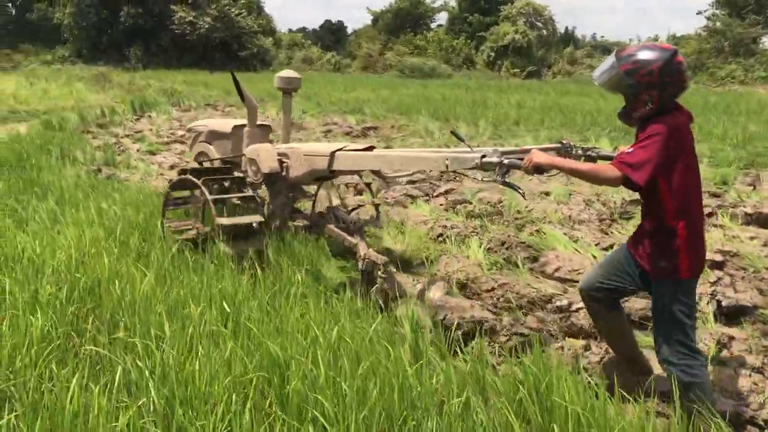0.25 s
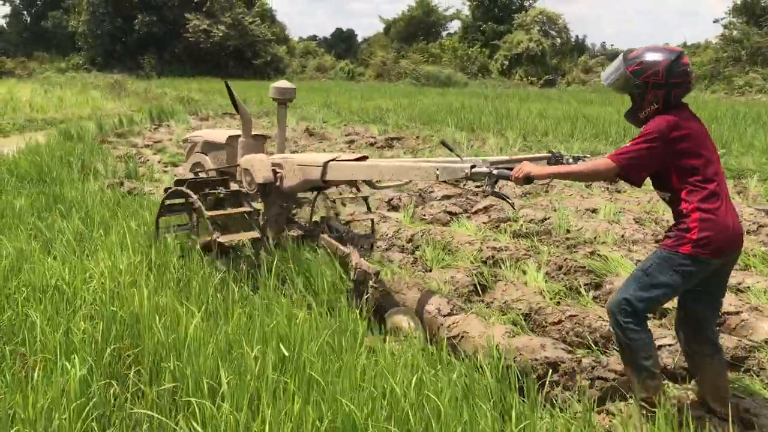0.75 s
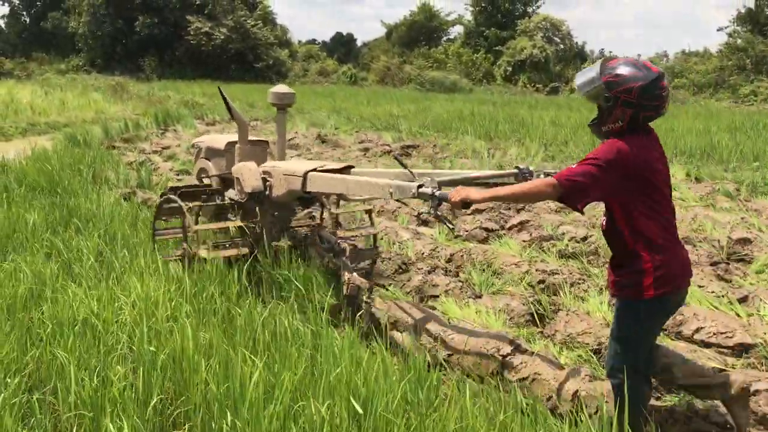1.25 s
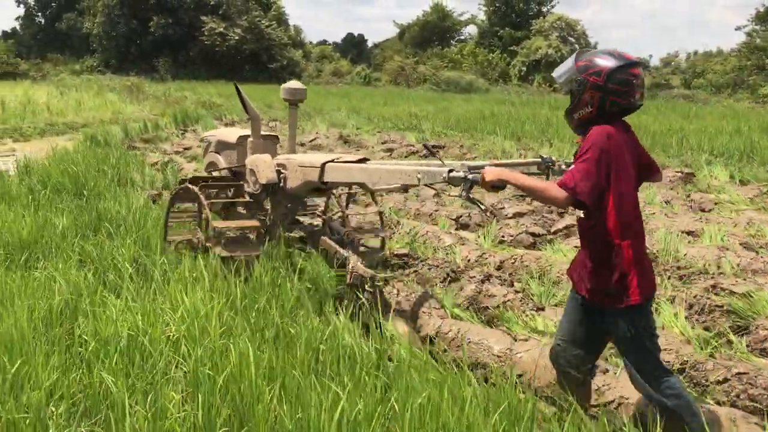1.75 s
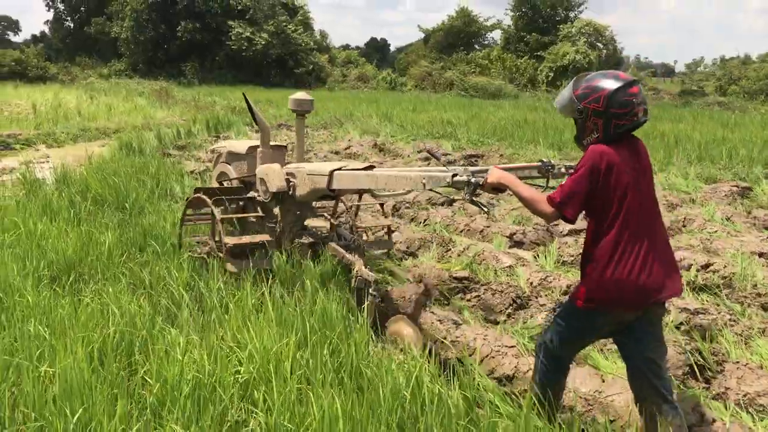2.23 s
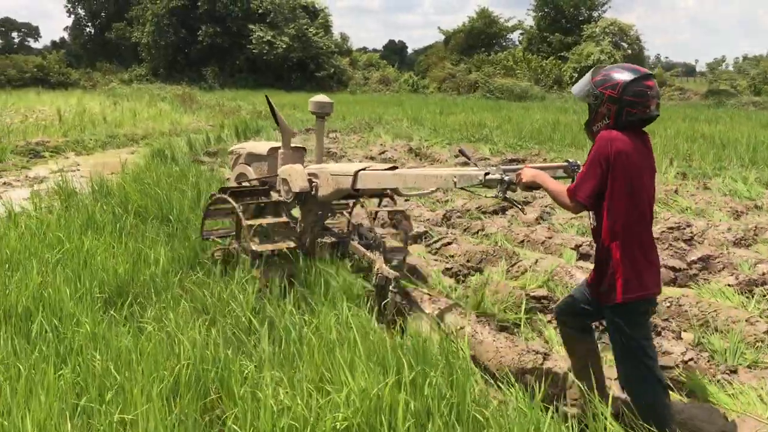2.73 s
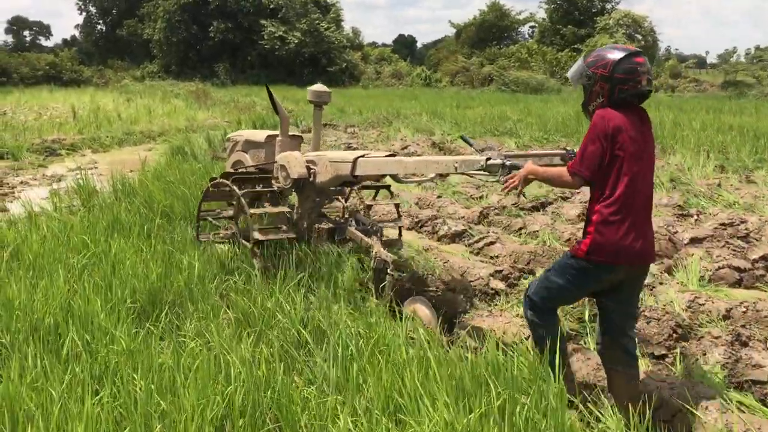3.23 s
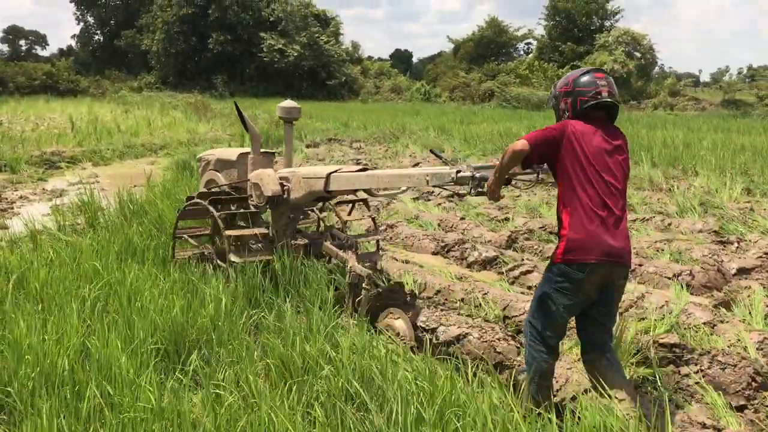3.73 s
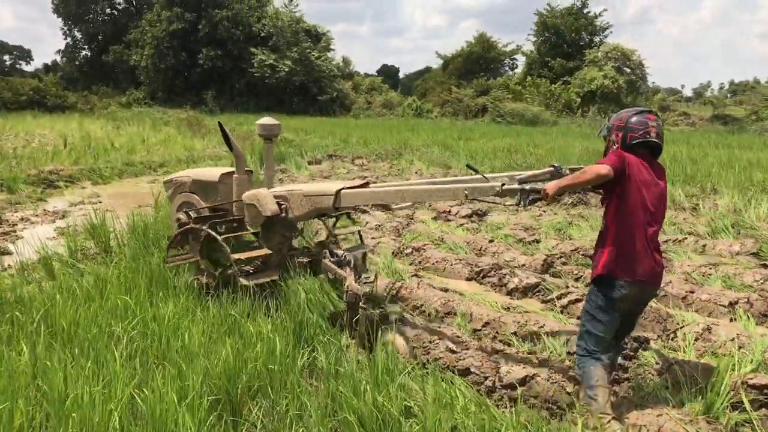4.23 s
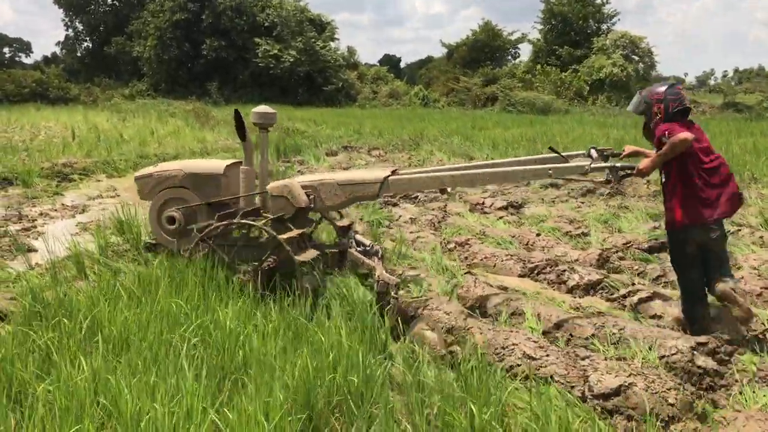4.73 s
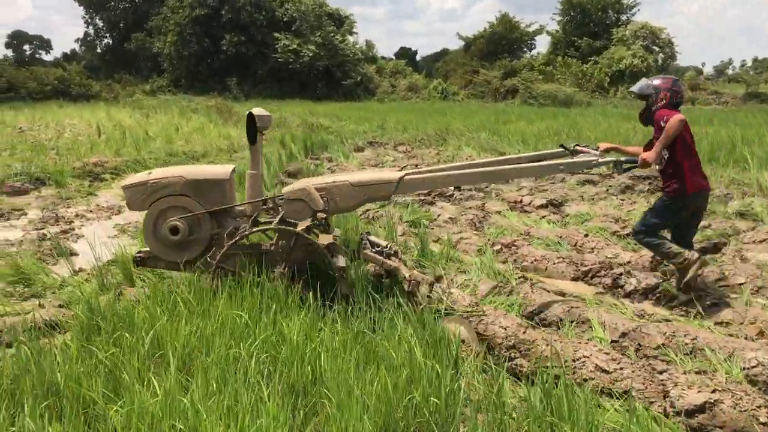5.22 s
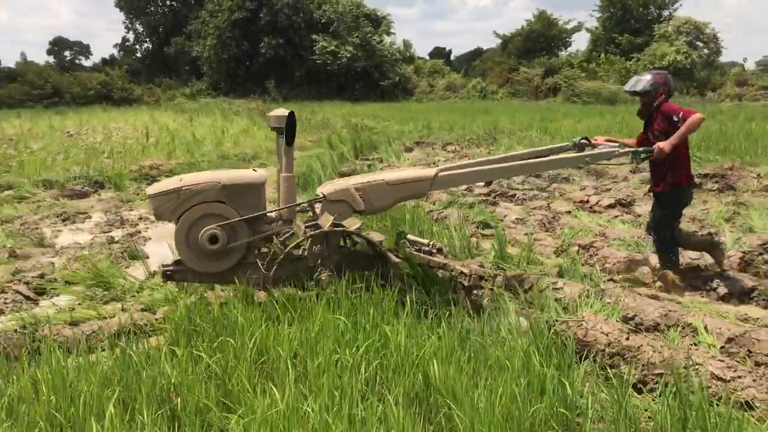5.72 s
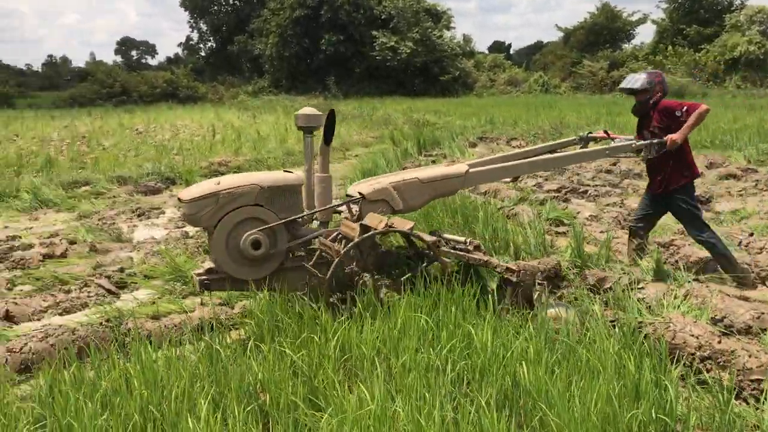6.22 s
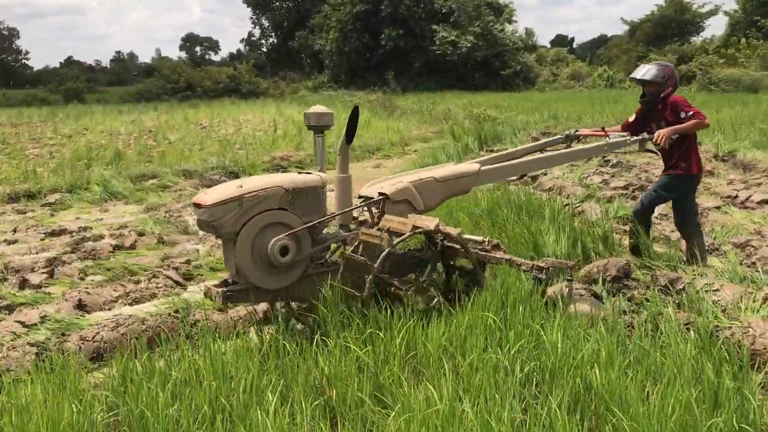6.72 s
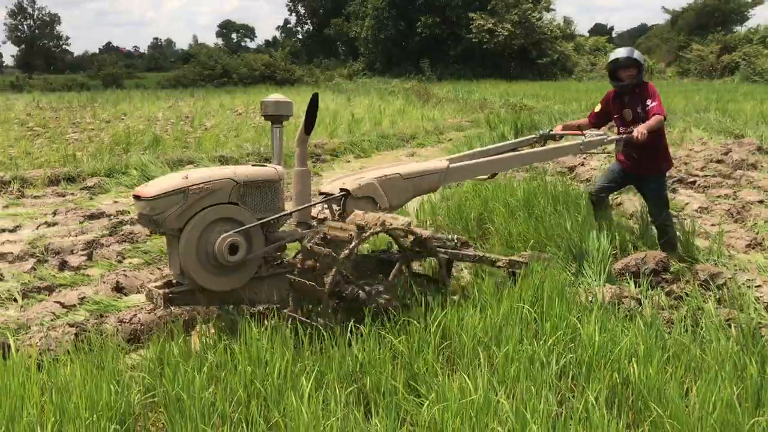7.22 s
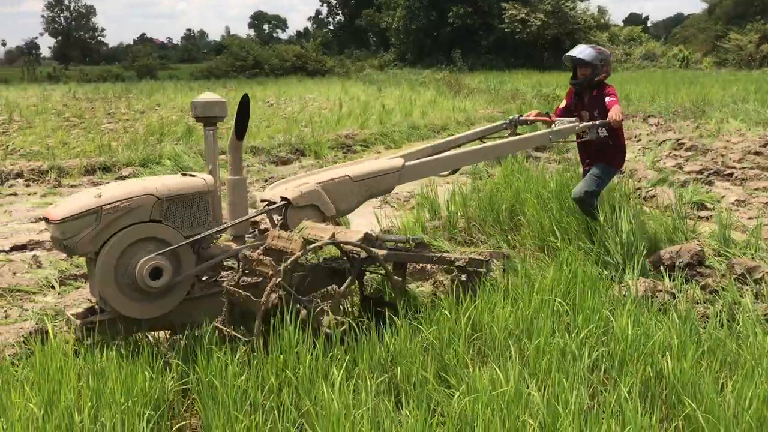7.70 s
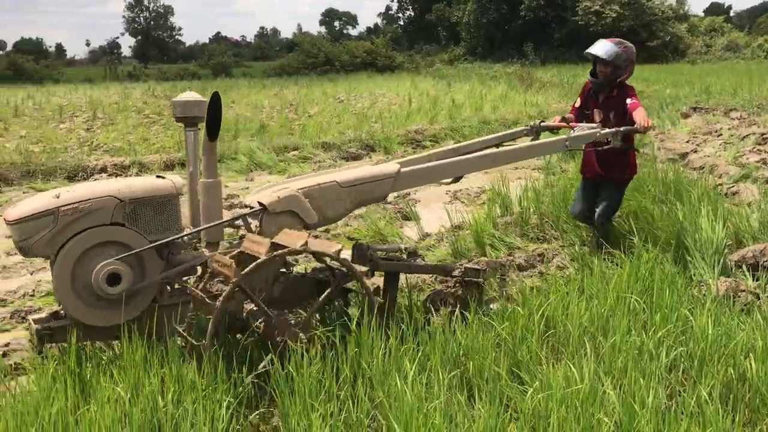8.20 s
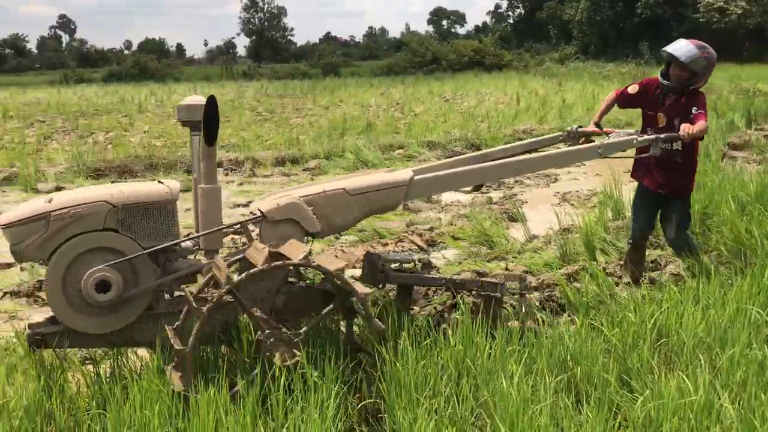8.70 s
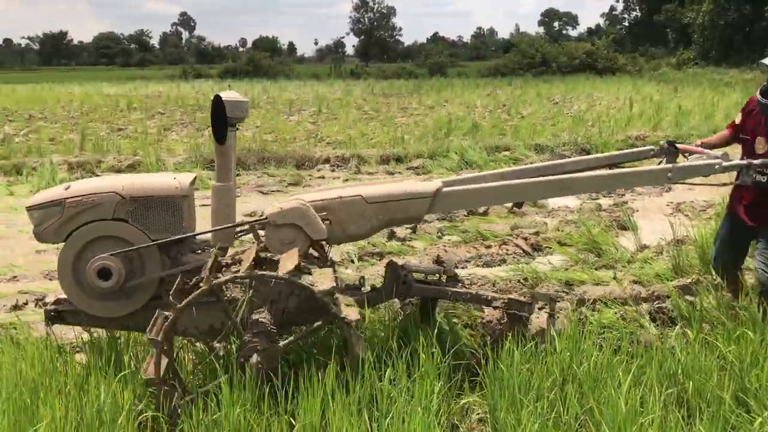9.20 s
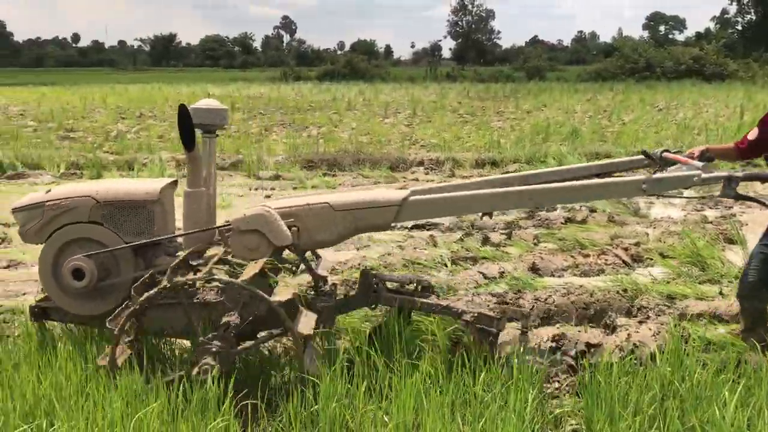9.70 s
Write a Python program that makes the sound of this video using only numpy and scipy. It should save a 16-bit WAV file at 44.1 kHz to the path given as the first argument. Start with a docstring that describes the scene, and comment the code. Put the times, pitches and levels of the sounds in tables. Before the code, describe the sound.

A single-cylinder diesel walking tractor pulls a plough through wet soil, already running at the start and still running at 10 seconds. It fires about seven times a second, slightly uneven: hard knock, faint valve tick, raspy mid-high bark with hiss and low thump, softer puff, then an airy gulp. Gears whirr quietly with loose ticking and thin rustle. At 1.0 s the linkage clanks; around 1.1-1.3 s beats falter, one nearly lost to weak spits. Firing softens near 2.6 and 3.8 s. At 3.95 s a longer metallic clatter comes with dull frame bumps, then a light clank at 5.0. From about 5 to 7 s strong and weak beats alternate; the view turns side-on, knock harder, hiss brighter. Small squeaks at 7.4 and 7.6 s, a strong clank at 8.8, a lesser one and brief stumble around 9.1. Dry, open-air, no echo.

```python
"""A wet open field is ploughed by a walking tractor, heard first from behind and then from the side.
Its one-cylinder four-stroke diesel fires about seven times a second: a knock of burning fuel, a tick of
the valve gear, a bark and low thump of the exhaust, a weaker puff, then a gulp of air.
These are shaped noise bursts and ringing tones. Filtered noise makes the gears, rustle and intake breath;
now and then the plough linkage clanks, the frame bumps or something squeaks."""
import sys
import numpy as np
from scipy import signal
from scipy.io import wavfile
from scipy.ndimage import uniform_filter1d

SR = 44100
rng = np.random.default_rng(int(sys.argv[2]) if len(sys.argv) > 2 else 0)


def wav_record(signal):
    """Record a signal, one row per channel, as 16-bit PCM in the file named by sys.argv[1]."""
    frames = np.transpose(np.atleast_2d(signal))
    bounded = np.clip(frames, -1, 1)
    # unit amplitude maps onto the largest positive 16-bit level
    quanta = np.round(bounded * 32767).astype(np.int16)
    wavfile.write(sys.argv[1], SR, quanta)


N = 438794  # samples in the scene, 9.95 s
T = np.arange(8192) / SR  # clock of one short sound (s)

# how the engine block colours a blow: pitch_hz, level_db
BLOCK_COLOUR = [(90, -25.5), (200, -5.5), (300, -8), (490, -13.5), (680, -2.5), (830, -6.5), (1000, -4),
                (1300, -3.5), (1620, -3), (2000, -4.5), (3000, -11.5), (3600, -19.5), (5000, -27.5),
                (16000, -31)]
# colour of bright, thin sounds (small ticks, stems and wet soil): pitch_hz, level_db
RUSTLE_COLOUR = [(1500, 3), (4500, -2.5), (7500, 1.5), (10000, 5), (16000, 2)]


def gain_of(db):
    """Turns decibels into amplitude."""
    return 10 ** (np.asarray(db) / 20)


def evened(x):
    """Scales a sound to an average strength (rms) of 1."""
    return x / np.sqrt(np.mean(x ** 2) + 1e-20)


def burst(x, db):
    """Gives a short sound the energy of 24 ms at the level db."""
    return gain_of(db) * x / np.sqrt(np.sum(x ** 2) / (.024 * SR) + 1e-20)


def add(mix, s, sound):
    """Mixes a sound in from time s, cutting off what falls outside the scene."""
    start = round(s * SR)
    part = mix[max(start, 0):][:max(len(sound) + min(start, 0), 0)]
    part += sound[max(-start, 0):][:len(part)]


def follow(points, s):
    """Reads a two-column table at time s, with straight lines between its points."""
    return np.interp(s, *np.transpose(points))


def read(points, size=2048):
    """Turns a colour table into a dB spectrum; below its first point it falls 12 dB an octave, by 40 at most."""
    hz, db = np.transpose(points)
    f = np.fft.rfftfreq(size, 1 / SR) + 10  # the 10 Hz keeps the logarithm finite
    fall = np.clip(12 * np.log2(f / hz[0]), -40, 0)
    return np.interp(np.log(f), np.log(hz), db) + fall


def colour(x, db):
    """Filters with the given spectrum without smearing sound ahead of an attack (minimum phase)."""
    log_gain = np.log(gain_of(np.r_[db, db[-2:0:-1]]))
    taps = np.fft.ifft(np.exp(np.conj(signal.hilbert(log_gain)))).real
    return signal.fftconvolve(x, taps)[:len(x)]


def resonate(x, hz, width):
    """Rings at one pitch; a narrower width in Hz rings longer."""
    r = np.exp(-np.pi * width / SR)
    return 2 * signal.lfilter([1 - r], [1, -r * np.exp(2j * np.pi * hz / SR)], x).real


def gust(rise, length, steep):
    """Turbulent air as noise that swells, holds for about length seconds and collapses."""
    swell = 1 - np.exp(-(T / rise) ** 2)
    return rng.standard_normal(len(T)) * swell / np.sqrt(1 + (T / length) ** steep)


def rattle(rise, t60, grain_db):
    """A blow breaks up into a shower of uneven impacts that falls 60 dB in t60 seconds."""
    grains = np.repeat(rng.standard_normal(len(T) // 32), 32)
    impacts = rng.standard_normal(len(T)) * gain_of(grain_db * grains)
    return impacts * (1 - np.exp(-T / rise)) * gain_of(-60 * T / t60)


def swing(hz, peak_s):
    """A resonance whose swing builds up for peak_s seconds and dies away."""
    return (T / peak_s) ** 2 * np.exp(2 - 2 * T / peak_s) * np.sin(2 * np.pi * hz * T)


def patches(depth_db, size=24):
    """Random peaks and dips across the spectrum: no two jets or blows have the same colour."""
    smooth = uniform_filter1d(rng.standard_normal(1025), size)
    return depth_db * evened(uniform_filter1d(smooth, size // 2))


def flutter(depth_db):
    """A jet tears into spurts about a millisecond long."""
    return gain_of(depth_db * evened(uniform_filter1d(rng.standard_normal(len(T)), size=48)))


def valve_times():
    """The exhaust valve opens once in every engine cycle, so its times follow the engine speed."""
    # speed sags as the plough bites and recovers under the governor: time_s, firings_per_s
    speed_points = [(0.0, 6.837), (1.21, 7.088), (1.4, 6.667), (1.8, 6.652), (1.93, 7.094), (2.76, 6.831),
                    (3.81, 7.22), (4.01, 6.951), (4.23, 7.427), (4.81, 7.008), (5.36, 7.082), (5.47, 6.84),
                    (5.69, 7.124), (6.13, 7.197), (6.58, 6.955), (6.69, 7.194), (7.27, 6.837),
                    (7.87, 7.031), (8.42, 6.909), (9.03, 7.109), (9.22, 6.674), (9.95, 7.2)]
    first_valve_s = .0900
    t = np.arange(N) / SR
    cycles = np.cumsum(follow(speed_points, t)) / SR
    cycles -= np.interp(first_valve_s, t, cycles)
    return np.interp(np.arange(np.ceil(cycles[-1] + .25)), cycles, t)


def firings():
    """The plough's load sets each firing's strength; chance scatters it.

    Rows: start_s, bark_db, hiss_db, thump_db, ring_hz, blast_s, knock_db.
    """
    # strength of the firings, following the load on the plough: time_s, change_db
    load_points = [(0, -0.5), (.24, .5), (.95, 0.9), (1.53, -1.4), (1.83, 1.5), (2.55, -3), (2.69, -0.7),
                   (3.56, 0.7), (3.83, -3), (4.39, -1.7), (4.53, -2.7), (4.67, 0.4), (6.93, -1.3),
                   (7.07, .5), (8.94, -0.1), (9.75, 0.8)]
    # firings that falter or catch up hard: time_s, bark_change_db, hiss_change_db, thump_change_db, knock_change_db
    misfires = [(1.095, -1.7, -7.5, -2.5, -2), (1.236, -14, -27, -5.5, 1), (6.221, -0.8, -3, -4, 0.5),
                (9.08, -3, -7, -4, 0.5), (9.227, 2, 0.5, 0, 5.5)]
    # pitch of the pipe's main ring before scatter: time_s, pitch_hz
    ring_points = [(0, 2293), (2.8, 2320), (3.5, 2400), (3.85, 2030), (4.12, 2000), (4.3, 2370),
                   (5.1, 2290), (6, 2390), (9.95, 2300)]
    # hardness of the knock before scatter, louder as the block turns side-on: time_s, level_db
    knock_points = [(0.0, -29), (0.52, -27.5), (0.67, -30), (1.83, -26.5), (1.98, -31.5), (3.13, -26.5),
                    (3.27, -30), (4.95, -27.3), (5.23, -29.7), (5.52, -25.1), (5.8, -28.5), (6.79, -23.5),
                    (7.79, -22.5), (7.94, -27.5), (8.37, -24.1), (9.95, -28.0)]
    # the governor hunts: strong and weak firings alternate for a while
    hunt_from_s, hunt_to_s, hunt_db = 4.6, 7.3, 0.72
    # at normal load; the hiss follows the load most steeply, the thump least (dB per dB)
    bark_db, hiss_db, thump_db = -15.5, -20.5, 1.3
    hiss_per_load, thump_per_load = 1.3, 0.29
    blast_s, blast_growth_per_db = 0.0072, 0.0249
    # scatter between firings: three in dB, then pitch and blast length as shares
    bark_scatter_db, hiss_scatter_db, knock_scatter_db = 0.6, 0.67, .5
    ring_scatter, blast_scatter = 0.059, 0.089

    s = valve_times()
    chance = rng.standard_normal((len(s), 5)).T
    hunting = (s > hunt_from_s) & (s < hunt_to_s)
    load = follow(load_points, s) + hunt_db * (-1) ** np.arange(len(s)) * hunting
    reach_s = np.diff(s).min() / 2  # a misfire changes only a firing this close to it
    bark, hiss, thud, slap = sum(np.outer(change, abs(s - at) < reach_s) for at, *change in misfires)
    return np.transpose([
        s,
        bark_db + load + bark + bark_scatter_db * chance[0],
        hiss_db + hiss_per_load * load + hiss + hiss_scatter_db * chance[1],
        thump_db + thump_per_load * load + thud,
        follow(ring_points, s) * (1 + ring_scatter * chance[2]),
        blast_s * np.exp(blast_growth_per_db * load + blast_scatter * chance[3]),
        follow(knock_points, s) + slap + knock_scatter_db * chance[4]])


def running_gear(clicks_per_s=70, spread_db=6.0):
    """Gears whirr as steady noise, loose parts tick in the block, and the wheels rustle in the field."""
    # gears, belt and flywheel: pitch_hz, level_db
    gear_colour = [(30, -19), (70, 0), (150, 7), (200, -2.5), (270, 1), (380, -2), (480, -15), (620, -1.5),
                   (860, -4.5), (1100, -0.5), (1600, -3.5), (2500, -10), (3500, -12.5), (5000, -22),
                   (9000, -35)]
    # relative loudness through the scene: time_s, gear_db, rustle_db
    bed_levels = [(0.0, -29, -46), (0.19, -32.5, -42.5), (2.19, -31.5, -45.5), (3.16, -33.5, -44),
                  (3.32, -34, -46), (6.15, -33.5, -50.5), (6.62, -30, -49), (6.93, -32.5, -45),
                  (8.59, -33, -48), (8.98, -28.5, -45), (9.42, -35.5, -47.5), (9.95, -34, -48.5)]
    s, gear_db, rustle_db = np.transpose(bed_levels)
    t = np.arange(N) / SR
    whirr = evened(colour(rng.standard_normal(N), read(gear_colour)))
    sizes = gain_of(spread_db * np.minimum(rng.exponential(1, N), 4)) * rng.choice([-1, 1], N)
    clicks = sizes * (rng.random(N) < clicks_per_s / SR)
    ticks = evened(colour(clicks, read(BLOCK_COLOUR)))
    rustle = evened(colour(rng.standard_normal(N), read(RUSTLE_COLOUR)))
    gears = (gain_of(-5) * whirr + gain_of(-28) * ticks) * gain_of(np.interp(t, s, gear_db))
    return gears + gain_of(2.5) * rustle * gain_of(np.interp(t, s, rustle_db))


def intake(beats):
    """The falling piston gulps air through the ringing stack, over a steady breath; the filter can hums after."""
    # air column of the intake stack: pitch_hz, width_hz, level_db
    stack_modes = [(610, 49, -13), (763, 8.3, 6), (957, 48, 2), (1100, 65, -1), (1157, 22, 3.5),
                   (1323, 24, 1), (1525, 43, 0), (1780, 41, -1), (2350, 320, -5), (3460, 220, -13)]
    gulp_lag_s, can_lag_s = .047, .0617  # after the exhaust valve opens
    can_hz, can_peak_s, can_db = 72, .036, -36.5
    flow = gain_of(-4.5) * rng.standard_normal(N)
    hum = np.zeros(N)
    for s, *_ in beats:
        gulp = gust(rise=0.015, length=0.022, steep=5.6)
        add(flow, s + gulp_lag_s, gain_of(2 * rng.standard_normal()) * gulp)
        hum_hz = can_hz * (1 + 0.054 * rng.standard_normal())
        add(hum, s + can_lag_s, gain_of(can_db) * swing(hum_hz, can_peak_s))
    stack = np.zeros(N)
    for hz, width, db in stack_modes:
        eddies = flow * rng.choice([-1, 1], N)  # each mode is stirred by its own eddies
        stack += gain_of(db) * resonate(eddies, hz, width)
    band = signal.butter(2, [550, 4000], "band", fs=SR, output="sos")
    return gain_of(-39.5) * evened(signal.sosfilt(band, stack)) + hum


def knock(beats):
    """Fuel ignites near the top of the stroke: a hard slap, then the block rings and loose parts chatter."""
    # ringing tones of the engine block and tank: pitch_hz, level_db, t60_s (time to fall 60 dB)
    block_modes = [(282.3, -5, 0.16), (381.7, -5, 0.15), (643.4, 1.5, 0.078), (1013, -4, 0.12),
                   (1188, 0, 0.06), (1510, 7.5, 0.045), (1672, 5, 0.074), (1866, -21, 0.14),
                   (2926, 0, 0.085)]
    knock_lead_s = .0312  # before the exhaust valve opens
    out = np.zeros(N)
    for s, *_, knock_db in beats:
        ring = 0
        for hz, db, t60 in block_modes:
            fade = gain_of(db + 3.9 * rng.standard_normal() - 60 * T / t60)
            ring = ring + fade * np.sin(2 * np.pi * (hz * T + rng.random()))
        slap = gust(rise=.002, length=.008, steep=6)
        chatter = rattle(rise=0.0014, t60=0.25, grain_db=2.5)
        block = read(BLOCK_COLOUR) + patches(depth_db=2.5, size=10)
        body = colour(evened(slap) + evened(chatter), block)
        blow = evened(body) + gain_of(-6) * evened(ring * (1 - np.exp(-T / 0.0035)))
        start_s = s - knock_lead_s + .0006 * rng.standard_normal()
        add(out, start_s, burst(blow, knock_db + 1.78))
    return out


def tappet(beats):
    """The rocker takes up its clearance with a bright tick shortly before the exhaust valve lifts."""
    tappet_lead_s = .019
    out = np.zeros(N)
    for s, *_ in beats:
        contact = rattle(rise=0.00028, t60=0.006, grain_db=14)
        tick = colour(contact, read(RUSTLE_COLOUR) + patches(depth_db=9))
        start_s = s - tappet_lead_s + 0.0015 * rng.standard_normal()
        add(out, start_s, burst(tick, -50 + 1.1 * rng.standard_normal()))
    return out


def blast(bark_db, hiss_db, ring_hz, length, side):
    """The valve opens: a jet of gas rings the pipe (bark) and hisses at its mouth."""
    # bark heard from behind: pitch_hz, level_db
    behind_colour = [(200, -10.5), (450, -32), (700, -14), (880, -25), (1300, -15), (1650, -11.5),
                     (1880, -2), (2050, -8), (2350, 1), (2650, -6), (3000, -4.5), (3700, -12.5),
                     (4400, -19), (6500, -26.5)]
    # bark heard from the side: pitch_hz, level_db
    side_colour = [(200, -19.5), (700, -24), (1200, -33), (1550, -3), (1760, -14.5), (2000, -5), (2400, -5),
                   (2950, -7.5), (3200, -6.5), (3550, -8.5), (3950, -7.5), (4600, -23), (6500, -53.5)]
    # gas hiss at the pipe mouth: pitch_hz, level_db
    hiss_colour = [(2000, -51), (4300, -2), (5000, 3), (5600, -2), (6600, 4.5), (7500, -4), (9000, 2.5),
                   (12500, 2), (16000, 0)]
    opening_s = .0016
    hiss_side_db = 2  # side-on, the pipe mouth turns towards the listener
    pipe = (1 - side) * read(behind_colour) + side * read(side_colour)
    jet = gust(opening_s, length=length * 1.17, steep=5.5)
    jet = colour(jet, pipe + patches(depth_db=2.5, size=12))
    ring = gust(opening_s, length=length * 1.16, steep=6.5)
    ring = resonate(resonate(ring, ring_hz, 220), ring_hz, 470)
    bark = burst(evened(jet) + gain_of(-3.5) * evened(ring), bark_db)
    hiss = gust(opening_s, length=length * 1.31, steep=5.3) * flutter(depth_db=1.5)
    hiss = colour(hiss, read(hiss_colour) + patches(depth_db=3.0))
    return bark + burst(hiss, hiss_db + hiss_side_db * side)


def thump(thump_db, side):
    """A slug of gas sets the silencer's air swinging: harder after a strong firing, duller from the side."""
    # low air modes of the silencer, before scatter: pitch_hz, relative signed pressure, peak_s (time to full swing)
    silencer_modes = [(52.2, -.0237, .0211), (80, .15, .0139), (94.4, .047, .0222), (123.2, .061, .0167),
                      (178, -.008, .012)]
    valve_open_s, choke_steepness = 0.056, 12  # the swing is choked once the exhaust valve shuts
    stretch = 1 + 0.022 * rng.standard_normal()
    air = 0
    for hz, size, peak_s in silencer_modes:
        db = .6 * rng.standard_normal() + 2 * (.5 - side) * np.log2(hz / 80)
        air = air + size * gain_of(db) * swing(hz * stretch, peak_s)
    return air * gain_of(thump_db) / np.sqrt(1 + (T / valve_open_s) ** choke_steepness)


def pipe_note(start_hz=540, end_hz=740, rise_s=0.0384):
    """The pipe's lowest note slides upward as hot gas fills it; its tuning scatters a little."""
    hz = start_hz + (end_hz - start_hz) * np.minimum(T / rise_s, 1)
    hz = hz * (1 + 0.037 * rng.standard_normal())
    tone = np.sin(2 * np.pi * (np.cumsum(hz) / SR + rng.random()))
    return tone * (1 - np.exp(-T / 0.014)) * gain_of(-60 * T / 0.096)


def exhaust(beats):
    """Each firing gives a blast, thump and pipe note, then a weaker puff as the piston clears the cylinder."""
    # view of the machine: time_s, side (0 from behind, 1 side-on)
    view_points = [(0, 0.18), (2.5, 0), (4.5, 0.13), (6.3, 0.93), (8, 0.74), (9.95, 1)]
    # gas pushed out by the rising piston: pitch_hz, level_db
    puff_colour = [(250, 6), (470, -17), (660, 4), (880, -8), (1450, -0.5), (2000, 1), (2350, 6),
                   (2700, -1.5), (3100, -4), (4200, -15), (6600, -18.5), (7600, -20.5), (16000, -23)]
    # small spits around the weakest firing: start_s, bark_db, hiss_db, ring_hz, blast_s
    spits = [(1.2185, -32, -35, 2280, 0.0087), (1.223, -24, -27, 2400, 0.012)]
    puff_lag_s = .0225
    out = np.zeros(N)
    for s, bark_db, hiss_db, thump_db, ring_hz, length, _ in beats:
        side = follow(view_points, s)
        add(out, s, blast(bark_db, hiss_db, ring_hz, length, side))
        add(out, s + .0018 + .0013 * side, thump(thump_db, side))
        add(out, s + 0.00396, burst(pipe_note(), -38 - 5 * side + rng.standard_normal()))
        puff = gust(rise=0.004, length=0.016, steep=7.7)
        puff = colour(puff, read(puff_colour) + patches(depth_db=2, size=8))
        add(out, s + puff_lag_s, burst(puff, -31.5 + 1.8 * side + rng.standard_normal()))
    for s, *spit in spits:
        add(out, s, blast(*spit, side=0))
    return out


def linkage():
    """Slack steel joints slam and chatter as the plough jerks; the frame bumps the ground and squeaks."""
    # blows in the plough linkage: start_s, level_db, t60_s (time to fall 60 dB)
    clanks = [(1.0155, -18, 0.093), (1.063, -48, .08), (3.947, -21.5, 0.19), (4.084, -37, 0.086),
              (5.044, -30.5, 0.044), (8.8423, -17.5, 0.077), (9.037, -29.5, .1)]
    # ring of the linkage: pitch_hz, width_hz, level_db
    linkage_modes = [(650, 56, 1), (1260, 300, -2), (1640, 300, 3), (1870, 260, 0), (2460, 150, 10.5),
                     (2730, 120, -9), (3070, 190, -26), (4100, 190, -26)]
    # dull bumps of the frame on hard clods: start_s, level_db
    bumps = [(3.954, -32), (4.068, -32.5)]
    # brief squeaks of the machine: start_s, level_db
    squeaks = [(7.417, -37), (7.562, -33)]
    out = np.zeros(N)
    mud = signal.butter(4, 3900, fs=SR)  # mud dulls the contact
    for s, db, t60 in clanks:
        chatter = rattle(rise=0.002, t60=t60, grain_db=3.5)
        ring = sum(gain_of(mode_db) * resonate(chatter, hz, width) for hz, width, mode_db in linkage_modes)
        add(out, s, burst(signal.lfilter(*mud, ring), db))
    for s, db in bumps:
        add(out, s, burst(swing(hz=285, peak_s=0.0081), db))
    for s, db in squeaks:
        rub = gust(rise=.004, length=0.011, steep=6)
        squeak = resonate(resonate(rub, 1360, 150), 1360, 150)
        add(out, s, burst(squeak, db))
    return out


def scene():
    """In the open field every source arrives dry, without echo."""
    beats = firings()
    engine = intake(beats) + knock(beats) + tappet(beats) + exhaust(beats)
    return (running_gear() + engine + linkage())[None]


def record(dry, ceiling=0.76):
    """The microphone colours the sound, the sharpest peaks meet a soft ceiling, and the top treble is cut."""
    # microphone colour: pitch_hz, level_db
    microphone_colour = [(20, 0), (6800, -1.5), (7700, -4), (8600, -3.5), (9800, -3.5), (10400, -7.5),
                         (11200, -2.5), (16000, 0)]
    edge_hz = 15950
    x = colour(dry[0], read(microphone_colour))
    x = x / (1 + (x / ceiling) ** 6) ** (1 / 6)
    low_pass = signal.firwin(511, edge_hz, window=("kaiser", 9), fs=SR)
    return signal.oaconvolve(x, low_pass, "same")[None]


dry = scene()
out = record(dry)
wav_record(out)
```